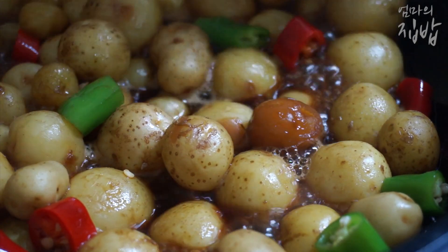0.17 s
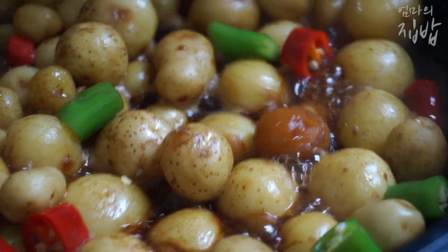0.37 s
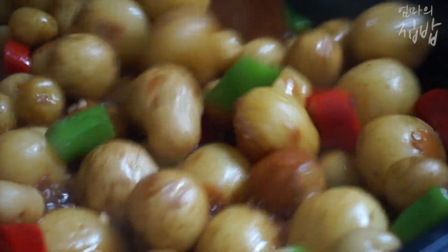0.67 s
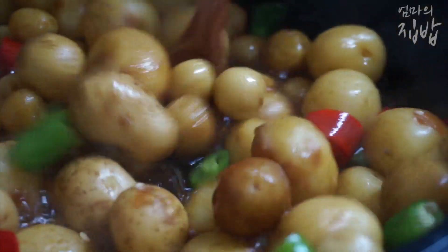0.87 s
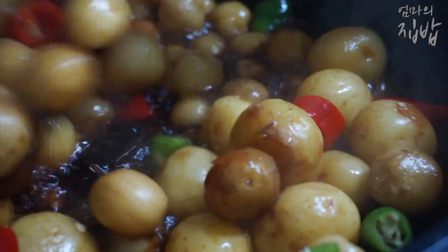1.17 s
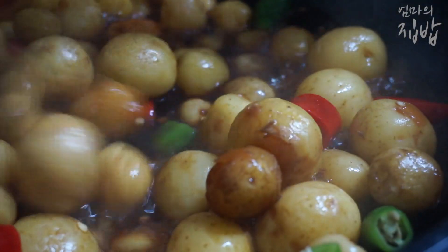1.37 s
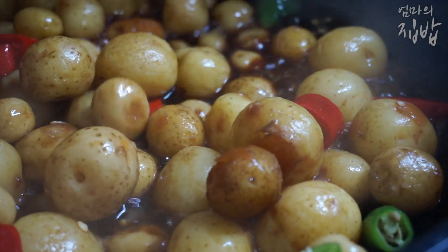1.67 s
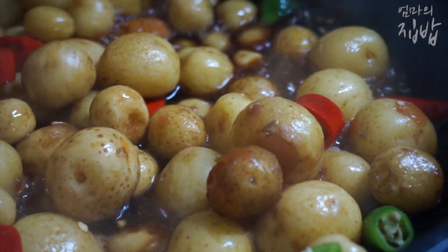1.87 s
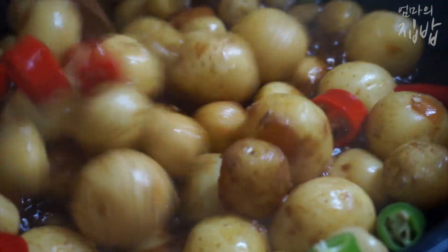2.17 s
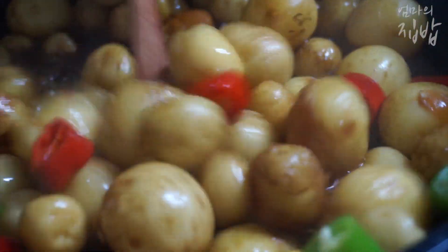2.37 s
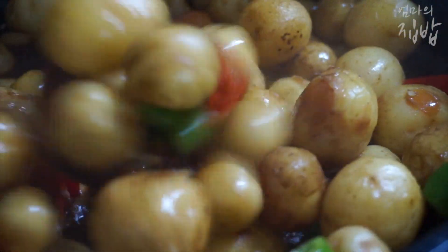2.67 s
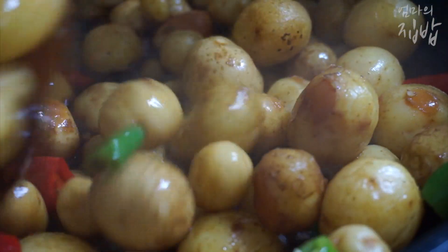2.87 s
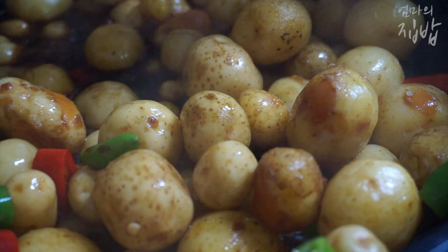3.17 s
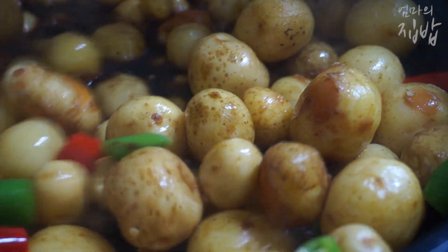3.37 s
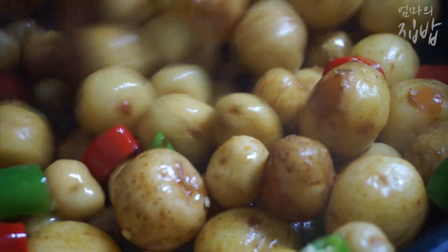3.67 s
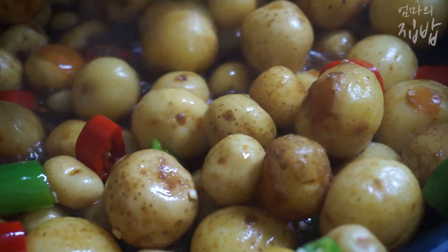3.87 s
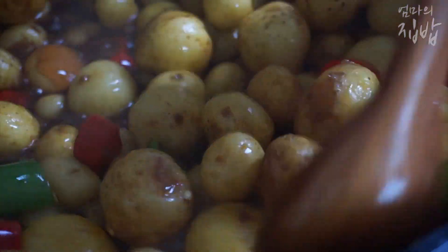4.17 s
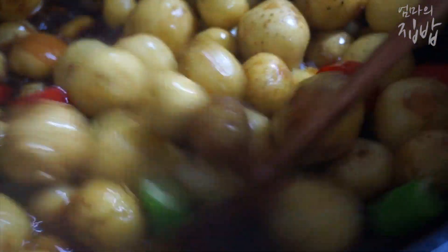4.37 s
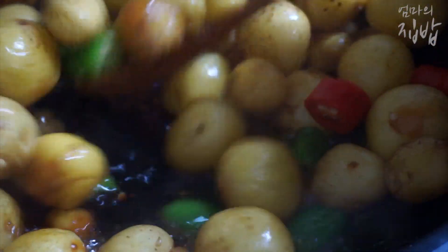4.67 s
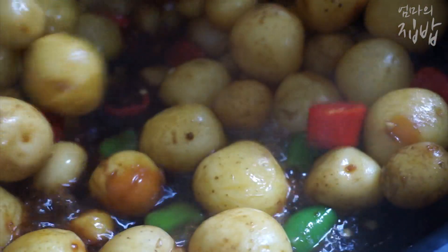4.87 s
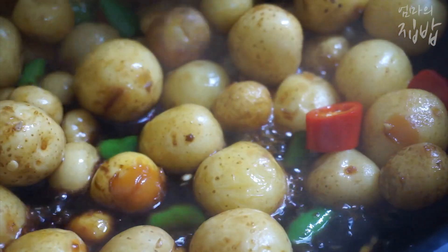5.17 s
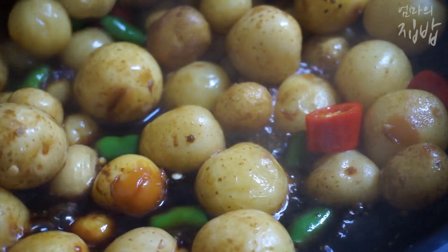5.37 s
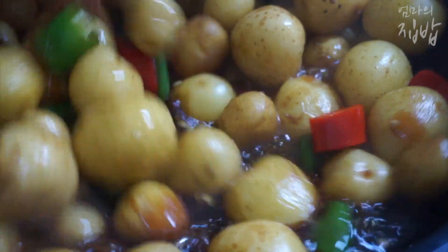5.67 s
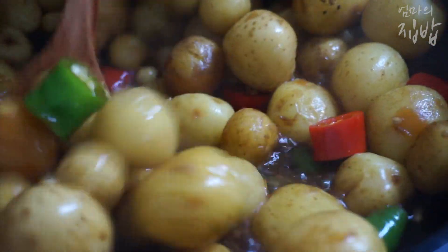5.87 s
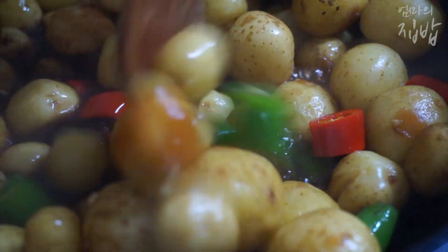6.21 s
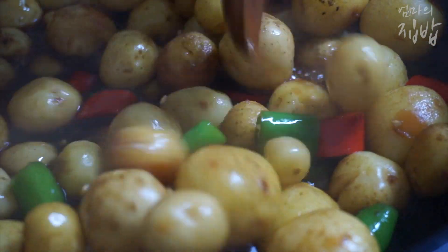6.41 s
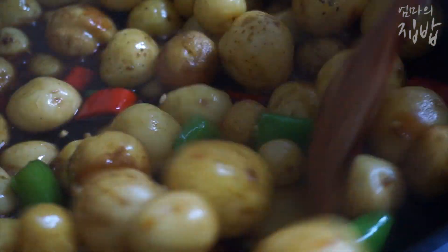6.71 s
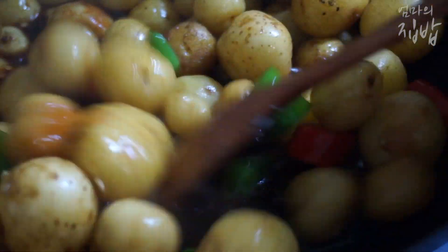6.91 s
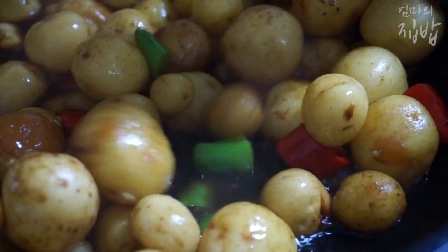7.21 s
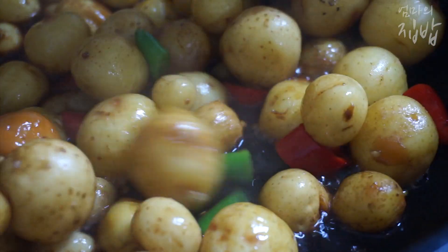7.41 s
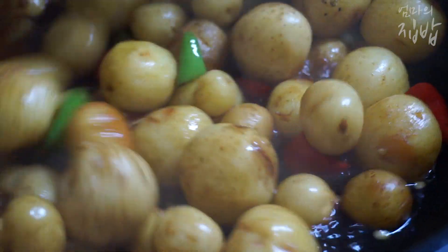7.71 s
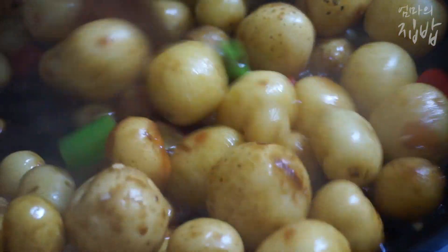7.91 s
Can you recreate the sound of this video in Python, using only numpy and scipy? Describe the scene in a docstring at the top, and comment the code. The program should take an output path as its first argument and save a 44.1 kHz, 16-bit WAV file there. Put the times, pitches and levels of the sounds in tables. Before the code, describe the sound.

Close-up simmering: wet glaze blubs, hisses and spits while potatoes are stirred, bumped and tumbled with a wooden spoon beside a whirring hob.

```python
"""Potatoes simmering in a thick glaze

Close by in a home kitchen, small potatoes simmer in a pan: the glaze bubbles (short resonances set off
by random bursts), sizzles (the same, denser and higher) and spits (snaps of resonant noise).
A wooden spoon turns the potatoes by stick and slip and knocks on the pan, exciting damped modes;
the sizzle sinks as they are turned over. The hob adds steady fan noise and a thin whine."""
import sys
import numpy as np
from scipy import signal
from scipy.fft import rfft, irfft, next_fast_len
from scipy.io import wavfile

SR = 44100
rng = np.random.default_rng(int(sys.argv[2]) if len(sys.argv) > 2 else 0)


def int16_out(signal):
    """Quantize to a 16-bit WAV file."""
    q = np.round(np.clip(np.atleast_2d(signal).T, -1, 1) * 32767)
    wavfile.write(sys.argv[1], SR, q.astype(np.int16))


N = 355005
CUTOFF_HZ = 11050  # upper limit of the sound


# Spectrum of the bubbling glaze. Each row: frequency in Hz, relative density in dB per Hz.
BUBBLING = [(40, -38), (90, -32), (122, -14), (175, -19.5), (255, -1), (370, -0.5), (450, -5), (540, 3.5),
            (660, 4.5), (880, 0), (1150, 8), (1600, -6), (2400, -3), (4000, -51)]
# Spectrum of the sizzle on the hot pan floor. Each row: frequency in Hz, relative density in dB per Hz.
SIZZLE = [(500, -14), (1200, 4), (2200, 4.5), (2700, 3), (3400, 2.5), (5000, -2), (7000, -6), (9000, -8),
          (11000, -9.5)]
POPS_PER_S, POPS_DB = 24, -13.5  # single bubbles that stand out, level relative to the bubbling


def glaze(bubbling_db, sizzle_db):
    """Resonance under random excitation: fat bubbles blub; fizz and crackle come from the hot floor."""
    births = clicks(1800 * from_db(2.5 * drift(9)), 3.24)
    fat = bubbles(births, 110.6, 3396, cycles=13.0, side_db=-11)
    pops = bubbles(clicks(POPS_PER_S, 2.5), 535, 3630, cycles=15, side_db=5)
    blubbing = coloured(fat, BUBBLING) + from_db(POPS_DB) * pops

    heat = from_db(sizzle_db - np.mean(sizzle_db))  # a hotter film bursts more often
    bursts = clicks(7000 * heat * from_db(2.2 * drift(35)), 3.06)
    fizz = bubbles(bursts, 973, 10600, cycles=8.8, side_db=-14.5)
    fizz = fizz / np.sqrt(heat)  # the level is set by sizzle_db alone

    snaps = clicks(160 * from_db(6.1 * drift(14)), 3.6)
    tails = signal.fftconvolve(snaps, dying_noise(0.047))[:N]
    crackle = cut(snaps + 1.5 * tails, 2800, "high", order=1)
    hiss = coloured(fizz, SIZZLE) + from_db(-5.5) * coloured(crackle, SIZZLE)
    return blubbing * from_db(bubbling_db + 3.5) + hiss * from_db(sizzle_db)


# Single spits at set times.
# Each row: start in seconds, relative peak level in dB, pitch in Hz.
SPITS = [(.072, -24.5, 5600), (0.5222, -25, 3150), (0.545, -25.5, 4010), (0.8041, -24, 3000),
         (1.241, -24.5, 3800), (1.4667, -26, 5640), (1.669, -28, 7040), (1.925, -24, 6960),
         (2.5127, -33, 3300), (2.9103, -34, 3470), (4.3914, -24, 3980), (4.7593, -27, 3650),
         (5.8243, -24, 3600), (6.7105, -31.5, 9380), (6.866, -31, 8500), (6.888, -31, 6800),
         (6.9304, -25.5, 2870), (7.3776, -27, 4000), (7.22, -37, 8500), (7.438, -31, 5500),
         (7.571, -32.5, 3800), (7.583, -37, 9000), (7.666, -30, 4500), (7.8243, -26.5, 5350)]


def spits(sizzle_db):
    """Impulsive release: a bubble tears open with a snap and sheds a short spray."""
    out = np.zeros(N)
    for s, db, hz in list(SPITS) + random_spits(sizzle_db):
        burst = 1.22 * dying_noise(0.043, size=2048)  # the spray
        burst[:100] += dying_noise(.003, size=100)  # the tear
        snap = cut(resonance(burst, hz, 0.49 * hz), CUTOFF_HZ, "low")
        add(out, s, snap / np.abs(snap).max() * from_db(db + 2.5))
    return out


SPITS_PER_S, SPIT_OVER_SIZZLE_DB, SPIT_SPREAD_DB = 7, 12, -0.5
SPIT_HZ, SPIT_SPREAD_OCTAVES = 5500, 0.44


def random_spits(sizzle_db):
    """Poisson process: further spits at chance times, peaks following the sizzle, in rows like SPITS."""
    born = np.flatnonzero(rng.random(N) < SPITS_PER_S / SR)
    rows = []
    for at, (loud, high) in zip(born, rng.standard_normal((len(born), 2))):
        peak_db = sizzle_db[at] + SPIT_OVER_SIZZLE_DB + SPIT_SPREAD_DB * loud
        rows.append((at / SR, peak_db, SPIT_HZ * 2 ** (SPIT_SPREAD_OCTAVES * high)))
    return rows


# Short wet squeaks, perhaps of potato skins rubbing. Each row: start in seconds, length in seconds,
# relative level in dB, pitch in Hz, glide in octaves, share of clean whistle from 0 to 1.
SQUEAKS = [(2.506, 0.031, -39.5, 4280, -.13, 0), (2.726, 0.039, -42.5, 4420, .15, 0.06),
           (2.804, 0.029, -42, 4420, -.13, .2), (2.876, 0.037, -40, 4440, .16, .3),
           (3.506, 0.049, -40, 4430, .05, 0.3), (3.633, 0.033, -40, 5300, -.06, .15),
           (3.747, 0.019, -37.5, 4750, -0.084, 0.45), (3.838, 0.022, -42, 5800, -.25, .2),
           (3.864, 0.028, -38.5, 5700, -.3, 0.9), (3.888, 0.036, -41, 5330, 0.17, 0.1),
           (3.95, .055, -42, 5500, .4, 0.1), (4.022, 0.022, -43, 7100, .1, .1)]
SPUTTERS_PER_S = 540


def squeaks(width_hz=230, rasp_hz=2400):
    """Amplitude modulation: a short gliding tone is modulated into a wet whistle or sputter."""
    out = np.zeros(N)
    for s, length, db, hz, glide, clean in SQUEAKS:
        size = round(length * SR)
        pitch = hz * 2 ** (glide * np.linspace(-.5, .5, size))
        phase = 2 * np.pi * np.cumsum(pitch) / SR
        whistle = rms_one(cut(rng.standard_normal(8192), width_hz / 2, "low", order=3)[-size:])
        sputter = rms_one(cut(judder(SPUTTERS_PER_S), rasp_hz / 2, "low", order=3)[:size])
        clean = np.clip(clean, 0, 1)
        strength = np.sqrt(clean) * whistle + np.sqrt(1 - clean) * sputter
        add(out, s, from_db(db) * rms_one(strength * np.sqrt(np.hanning(size)) * np.sin(phase)))
    return out


# Cooler potatoes are turned down onto the pan floor. Each row: start in seconds, loss of sizzle in dB.
TURNOVERS = [(4.25, 5.5), (5.9, 4.5)]
# The spoon pushes potatoes over the pan floor. Each row: start in seconds, length in seconds,
# relative level of the rubbing in dB, relative level of the flare of the sizzle in dB.
STROKES = [(0.0, 0.54, -40, -54), (0.918, 0.94, -46, -52), (1.923, 0.28, -42.5, -44.5),
           (2.82, 0.23, -49, -45), (3.246, 0.38, -49, -46), (4.1, 0.22, -41, -39.3),
           (4.337, 0.15, -40, -47), (5.57, 0.11, -41, -49.5), (6.844, 0.075, -38.5, -46),
           (7.352, 0.31, -44.5, -51.5), (7.917, 0.16, -47.5, -62.5)]
SIZZLE_DB, BUBBLING_DB = -42, -47.5  # relative levels before turnovers and strokes
BUBBLING_FOLLOWS = 0.57  # share of the sizzle's loss in dB that the bubbling follows
COOLING_S = 0.56
CHURN_DB = -4  # extra bubbling under the spoon, relative to its rubbing


def cooking():
    """Heat transfer sets the levels in dB: a turnover cools the floor, a stroke churns and flares."""
    t = np.arange(N) / SR
    heat_db = -sum(loss_db * np.clip((t - s) / COOLING_S, 0, 1) for s, loss_db in TURNOVERS)
    rubbing, flare = 1e-12, 0
    for s, length, rub_db, flare_db in STROKES:
        push = stroke(s, length)
        rubbing = np.hypot(rubbing, from_db(rub_db) * push)
        flare = np.hypot(flare, from_db(flare_db) * push)
    bubbling = np.hypot(from_db(BUBBLING_DB + BUBBLING_FOLLOWS * heat_db), from_db(CHURN_DB) * rubbing)
    sizzle = np.hypot(from_db(SIZZLE_DB + heat_db), flare)
    return 20 * np.log10([bubbling, sizzle, rubbing])


PUSH_S, SETTLE_DB_PER_S = 0.049, 80


def stroke(s, length):
    """Attack and decay: a push of the spoon builds up, holds, then the potatoes settle."""
    t = np.arange(N) / SR - s
    return np.clip(t / PUSH_S, 0, 1) * from_db(-SETTLE_DB_PER_S * np.maximum(t - length, 0))


# Spectrum of wet potatoes rubbing. Each row: frequency in Hz, relative density in dB per Hz.
RUBBING = [(100, -24), (280, -17), (600, 3.5), (850, 1.5), (1150, 3.5), (1700, -12), (3000, -24),
           (8000, -59)]
# Modes of the pan, also rung by the knocks.
# Each row: frequency in Hz, relative level in dB, decay time T60 in seconds.
PAN = [(562, -13, .4), (815, -18, .3), (1133, -25, .25), (1288, -26, .2), (1505, -22, .22),
       (2046, -15, .26), (2408, -19, .22), (2790, -30, .25), (3100, -28, .16), (3200, -31, .24),
       (3682, -29.5, .26), (4650, -34, .2), (4926, -36, .25), (5680, -35, .14), (6632, -32.5, .26),
       (7270, -34, .2), (8900, -33, .18)]


def stirring(level_db, clump_db=3):
    """Stick-slip friction: wet potatoes slip in clumps, the pan sings, glaze swept onto hot metal hisses."""
    contacts = clicks(900 * from_db(clump_db * drift(25)), 2.5)
    slips = coloured(bubbles(contacts, 191.0, 8200, cycles=18.0, side_db=-14.5), RUBBING)
    # the level column of PAN plays no part here: every mode sings at unit gain
    singing = rms_one(sum(resonance(slips[0], hz, 3 / t60) for hz, _, t60 in PAN))
    searing = bubbles(clicks(5600, 3.3), 3200, 13000, cycles=3.5, side_db=-22)
    searing = rms_one(cut(searing, 5600, "low", order=1))
    return (slips + from_db(-6.5) * singing + from_db(-11.5) * searing) * from_db(level_db - 7.0)


# Short modes of the wooden spoon.
# Each row: frequency in Hz, relative level in dB, decay time T60 in seconds.
SPOON = [(1430, -8, 0.03), (2115, 4.5, 0.014), (2584, -2.5, 0.016), (3000, 3.5, 0.011), (3540, 5, 0.0086),
         (4000, 2, 0.0064), (5640, -0.5, 0.02)]
# Spoon and potatoes against the pan. Each row: start in seconds, thud in dB, thud in Hz, thud T60 in
# seconds, clack in dB, clack in Hz, crack in dB, top of the crack in Hz, wet snap in dB, pan ring in dB,
# pan boom in dB, room in dB, left-right difference in dB. All levels are relative.
KNOCKS = [(0.1139, -14.5, 1200, 0.0037, -17, 2250, -7, 4600, -22, 4, -25, -1, 1),
          (.2270, -19, 1290, 0.017, -34, 1700, -33, 3200, -35, 0, -40, -4.5, 0),
          (0.4581, -22.5, 1250, 0.0037, -28, 3000, -22.5, 8500, -31, 5.5, -38, -2, 1.5),
          (1.7871, -12, 1000, 0.0034, -20, 2500, -19.5, 5000, -12.5, -8.5, -25, -2.5, 3.5),
          (2.0258, -22, 1250, 0.012, -29, 2200, -38, 3800, -32, -14, -45, -2, 0),
          (3.2793, -19, 800, 0.0045, -29, 2200, -15, 5240, -25, -16, -45, -5, 2),
          (4.116, -14.5, 1190, 0.01, -11, 4200, -11.5, 9400, -20, 4.5, -18, -1.2, -3),
          (4.4652, -18.5, 1140, 0.012, -42, 2820, -40, 4500, -36, -13, -43, -4, 1),
          (5.3850, -10.5, 1064, 0.019, -13.5, 2000, -12.5, 3100, -22, -30, -37, -7.5, 2),
          (6.8555, -8.5, 1110, 0.023, -27, 1550, -45, 2700, -21, -24, -34, -6.5, 1),
          (7.4662, -14.5, 675, 0.015, -19.5, 2700, -25, 3460, -17, -10.5, -33, -5, 2.5)]
CRACK_SPAN = 2.4  # ratio of the crack's top edge to its lower edge: a harder contact raises both
SNAP_HZ, SNAP_T60_S = 5800, .014  # the film of glaze parts at the contact: lower edge and decay
BOOM_RISE_S = 0.016  # the loaded pan floor takes a moment to swing


def knocks(size=16384):
    """Modal excitation by impact: thud, clack of wood, crack and wet snap; pan modes ring, its floor booms."""
    direct, to_room, tap = np.zeros((2, N)), np.zeros(N), signal.unit_impulse(size)
    for (s, thud_db, thud_hz, thud_t60, clack_db, clack_hz, crack_db, crack_hz,
         snap_db, ring_db, boom_db, room_db, left_db) in KNOCKS:
        thud = from_db(thud_db) * cut(ring(tap, thud_hz, thud_t60), 450, "high", order=3)
        wood = struck(SPOON, [(clack_db, clack_hz)], reach_octaves=0.51)
        clack = from_db(-4) * cut(wood, 460, "high")
        grit = tap + 0.75 * dying_noise(0.007) + 0.3 * dying_noise(0.067)
        crack = cut(cut(grit, crack_hz / CRACK_SPAN, "high"), crack_hz, "low", order=5)
        crack *= from_db(crack_db + 10) / np.linalg.norm(crack)
        snap = cut(cut(tap + dying_noise(SNAP_T60_S), SNAP_HZ, "high"), CUTOFF_HZ, "low", order=6)
        snap *= from_db(snap_db) / np.linalg.norm(snap)
        blow = thud + clack + crack + snap

        forces = [(thud_db + ring_db, thud_hz), (clack_db + ring_db, clack_hz),
                  (crack_db + ring_db, 0.91 * crack_hz)]
        ringing = struck(PAN, forces, reach_octaves=0.55)
        swing = 1 - np.exp(-np.arange(size) / SR / BOOM_RISE_S)
        boom = swing * struck(PAN, [(boom_db, PAN[0][0])], reach_octaves=0.43)
        sound = cut(blow + boom + ringing, 160, "high")
        off_wall = signal.fftconvolve(sound, dying_noise(.004, size=256))[:size]
        add(direct, s, stereo(sound, off_wall, -19) * balance(left_db))
        add(to_room, s, from_db(room_db) * blow)
    return direct + from_db(-2.5) * kitchen(to_room, wall_hz=5500, side_db=-8)


# The edge of the spoon scrapes the pan floor.
# Each row: start in seconds, length in seconds, relative level in dB, pitch in Hz.
SCRAPES = [(4.14, 0.19, -46.5, 3140), (4.14, 0.14, -47.5, 1420), (4.385, 0.087, -41.5, 1140)]
SLIPS_PER_S, SLIP_SPREAD_DB = 380, 3
SCRAPE_WIDTH = 0.14  # width of the narrow resonance as a share of its pitch


def scrapes():
    """Stick-slip friction: the edge of the spoon judders on the pan floor and excites a narrow resonance."""
    out = np.zeros(N)
    for s, length, db, hz in SCRAPES:
        size = round(length * SR)
        narrow = resonance(judder(SLIPS_PER_S, SLIP_SPREAD_DB), hz, SCRAPE_WIDTH * hz)
        rasp = resonance(narrow, hz, .5 * hz)[:size]
        add(out, s, from_db(db) * rms_one(rasp * np.sqrt(np.hanning(size))))
    return out + from_db(-7.5) * kitchen(out, side_db=-2)


# Potatoes tumbling onto one another.
# Each row: start in seconds, relative peak level in dB, pitch in Hz, decay time T60 in seconds.
TUMBLES = [(.495, -24.5, 1310, 0.057), (1.236, -53, 144, 0.24), (1.697, -31, 1260, .02),
           (1.787, -33.5, 264, 0.14), (1.796, -25, 1090, 0.087), (1.83, -46, 165, 0.18),
           (1.982, -29, 1130, 0.022), (2.232, -27, 1170, .02), (3.283, -41, 333, .16),
           (4.123, -20.5, 1110, .08), (4.407, -30.5, 1170, .04), (5.389, -34, 320, .2),
           (6.858, -23, 634, 0.13), (6.8635, -20.5, 1080, .04), (7.371, -27.5, 1200, .03),
           (7.472, -26, 420, 0.079), (7.495, -33, 576, 0.27), (7.571, -29.5, 1000, .02),
           (7.783, -26, 1350, .03)]


def tumbles(size=8192):
    """Heavily damped impact: soft flesh lands with a dull bump and rolls on for a moment."""
    out = np.zeros(N)
    for s, db, hz, t60 in TUMBLES:
        contact = 0.25 * signal.unit_impulse(size) + dying_noise(t60, size=size)
        bump = resonance(resonance(contact, hz, 0.75 * hz), hz, 0.75 * hz)
        add(out, s, from_db(db) * bump / np.abs(bump).max())
    return out + from_db(-7.5) * kitchen(out, side_db=-12)


# Spectrum of the fan's rush. Each row: frequency in Hz, relative density in dB per Hz.
FAN = [(30, -25), (90, -26), (125, -26), (180, -14), (280, -13), (460, -1), (620, 1.5), (840, 2), (1080, 9),
       (1450, 5), (1800, 3), (2100, -1), (2300, -7.5), (11000, -16.5)]
# Resonances of the hob's fan housing and the whine of its electronics.
# Each row: frequency in Hz, approximate width in Hz, relative level in dB, left-right difference in dB.
HOB_TONES = [(126, 26, -26, -2), (663, 170, -9, -2), (1130, 97, -4, 2), (1288, 71, 4.5, 4.5),
             (1560, 115, -11, 23), (1928, 42, 1.5, 5), (2037, 42, -8, 22), (9340, 150, -8.5, 2.5)]
FAN_DB, HOB_TONES_DB = -42.5, -44.5


def hob():
    """Filtered broadband noise: the cooling fan rushes through its housing under a thin electronic whine."""
    air = stereo(*rng.standard_normal((2, N)), -13, wide_hz=25)
    hum = stereo(*rng.standard_normal((2, N)), -11, wide_hz=25)
    tones = 0
    for hz, width, db, left_db in HOB_TONES:
        each = 1.52 * width  # two in cascade are narrower than one
        tone = rms_one(resonance(resonance(hum, hz, each), hz, each))
        tones = tones + from_db(db) * balance(left_db) * tone
    rush = from_db(FAN_DB) * coloured(air, FAN) * balance(1.2)
    return rush + from_db(HOB_TONES_DB) * rms_one(tones)


KITCHEN_T60_S = 0.24


def kitchen(x, wall_hz=4500, side_db=-12):
    """Reverberation: pan wall, worktop and room return reflections duller than the direct sound."""
    mid, side = (dying_noise(KITCHEN_T60_S) + dying_noise(0.022) for _ in range(2))
    echo = cut(stereo(mid, side, side_db), wall_hz, "low", order=1)
    echo = np.pad(echo, ((0, 0), (round(.002 * SR), 0)))  # first reflection after 2 ms
    return signal.fftconvolve(x[None], echo, axes=1)[:, :N]


def bubbles(births, low_hz, high_hz, cycles, side_db, count=22):
    """Damped oscillation: each bubble rings a few cycles at its own pitch and place; flat spectrum."""
    dealt, place = rng.integers(0, count, N), rng.standard_normal(N)
    placed = stereo(births, births * place, side_db)
    pitches = np.geomspace(low_hz, min(high_hz, .4 * SR), count)
    return rms_one(sum(resonance(placed * (dealt == k), hz, 2 * hz / cycles)
                       for k, hz in enumerate(pitches)))


def struck(modes, forces, reach_octaves, size=16384):
    """Modal superposition: modes answer most where the forces (dB, Hz) of a blow lie."""
    tap, out = signal.unit_impulse(size), np.zeros(size)
    for k, (hz, db, t60) in enumerate(modes):
        drive = sum(from_db(force_db) * np.exp(-(np.log2(hz / force_hz) / reach_octaves) ** 2)
                    for force_db, force_hz in forces)
        out += (-1) ** k * drive * from_db(db) * ring(tap, hz, t60)
    return out


def judder(per_s, spread_db=5.5, size=16384, count=512):
    """Irregular pulse train: uneven in spacing and strength."""
    at = (np.cumsum(rng.uniform(.5, 1.5, count)) * SR / per_s).astype(int)
    sizes = from_db(spread_db * rng.standard_normal(count)) * rng.choice([-1, 1], count)
    return np.bincount(at, sizes, size)[:size]


def clicks(per_s, spread_db):
    """Poisson process: random collapses, many small and a few large."""
    sizes = from_db(spread_db * np.minimum(rng.exponential(1, N), 4))
    return (rng.random(N) < per_s / SR) * sizes * rng.choice([-1, 1], N)


def dying_noise(t60, size=16384):
    """Exponential decay: a burst of noise that dies away; energy 1."""
    burst = rng.standard_normal(size) * from_db(-60 * np.arange(size) / SR / t60)
    return burst / np.linalg.norm(burst)


def drift(rate):
    """Random modulation: slow chance with spread 1, through `rate` random values a second."""
    knots = rng.standard_normal(N // 40)
    return rms_one(np.interp(np.arange(N) / SR * rate, np.arange(len(knots)), knots))


def ring(x, hz, t60):
    """Damped oscillator: a unit click sets a sine of height 1 ringing."""
    r, w = from_db(-60 / (t60 * SR)), 2 * np.pi * hz / SR
    return signal.lfilter([0, np.sin(w)], [1, -2 * r * np.cos(w), r * r], x + 1e-18)


def resonance(x, hz, width_hz):
    """Forced resonance: a band-pass with gain 1 on top."""
    r, w = np.exp(-np.pi * width_hz / SR), 2 * np.pi * hz / SR
    top = np.array([1, 0, -1]) * (1 - r * r) / 2
    return signal.lfilter(top, [1, -2 * r * np.cos(w), r * r], x + 1e-18)


def cut(x, hz, kind, order=2):
    """Butterworth filtering: keep what lies above ("high") or below ("low") the edge."""
    return signal.sosfilt(signal.butter(order, min(hz, .45 * SR), kind, fs=SR, output="sos"), x)


def coloured(x, spectrum):
    """Spectral shaping: give a flat sound a smooth spectrum; rms 1."""
    hz, db = np.transpose(spectrum)
    size = next_fast_len(N + 4096)
    grid = np.maximum(np.fft.rfftfreq(size, 1 / SR), 1)
    gain = from_db(np.interp(np.log(grid), np.log(hz), db))
    gain = gain * np.minimum(grid / hz[0], 1) ** 2 * (grid < CUTOFF_HZ)
    return rms_one(irfft(rfft(x, size) * gain, size)[..., :N])


def stereo(mid, side, side_db, wide_hz=230, narrow_hz=4800):
    """Mid-side stereo of a close microphone pair; bass and treble are narrower than the middle."""
    side = cut(cut(side, wide_hz, "high", order=1), narrow_hz, "low", order=4)
    return mid + from_db(side_db) * side * np.array([[1], [-1]])


def balance(left_db):
    """Level difference between the ears: gains that make the left louder by left_db."""
    return from_db(left_db * np.array([[.5], [-.5]]))


def from_db(db):
    """Decibel scale: amplitude ratio of a level."""
    return 10 ** (np.asarray(db) / 20)


def rms_one(x):
    """Effective value: scale a sound to rms 1."""
    return x / np.sqrt(np.mean(x ** 2) + 1e-20)


def add(out, s, sound):
    """Superposition: mix a short sound in at time s."""
    at = max(round(s * SR), 0)
    out[..., at:at + sound.shape[-1]] += sound[..., :N - at]


def scene(left_db=0.4):
    """Superposition of sources: the pan, close and slightly to the left, over the steady hob."""
    bubbling_db, sizzle_db, rubbing_db = cooking()
    simmer = glaze(bubbling_db, sizzle_db) + spits(sizzle_db) + squeaks()
    spoon = stirring(rubbing_db) + scrapes() + knocks() + tumbles()
    pan = from_db(-1.44) * simmer + from_db(-10.0) * kitchen(simmer[0]) + spoon
    return pan * balance(left_db) + hob()


def record(dry):
    """Band limiting: an elliptic low-pass cuts the top steeply."""
    return signal.sosfilt(signal.ellip(10, .3, 70, CUTOFF_HZ, fs=SR, output="sos"), dry)


dry = scene()
out = record(dry)
int16_out(out)
```